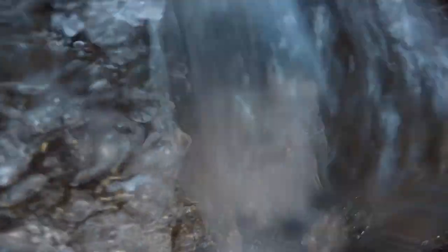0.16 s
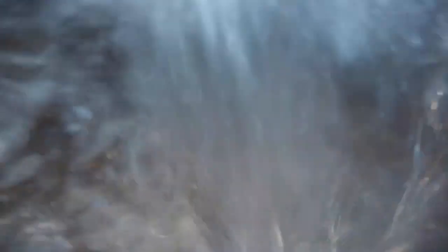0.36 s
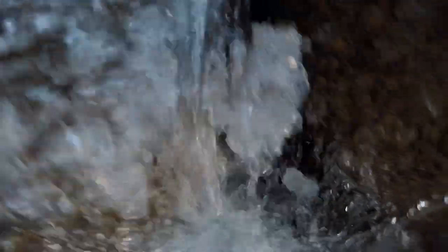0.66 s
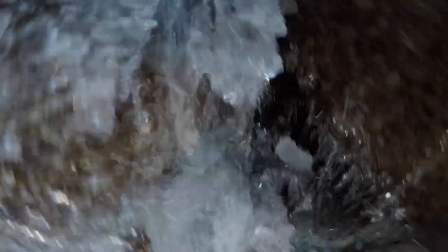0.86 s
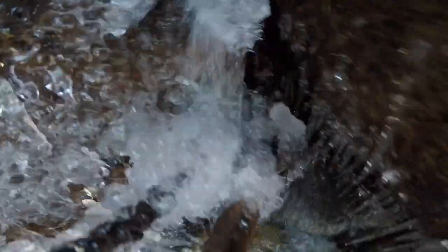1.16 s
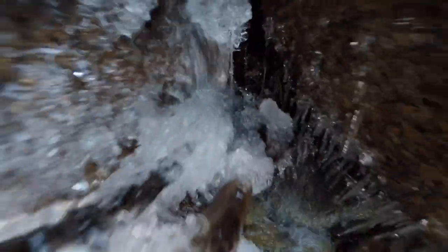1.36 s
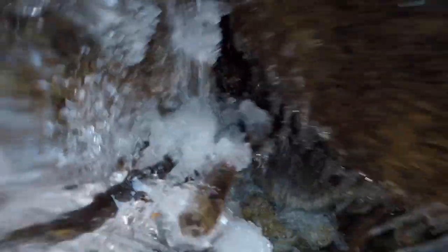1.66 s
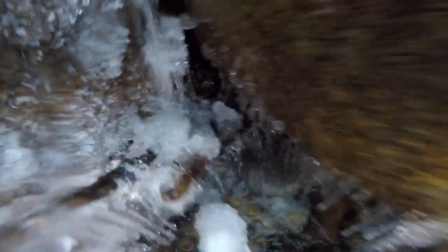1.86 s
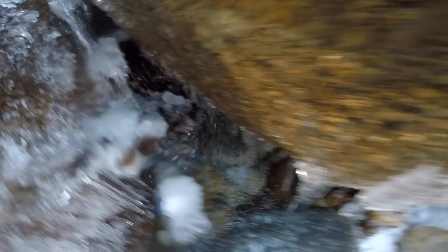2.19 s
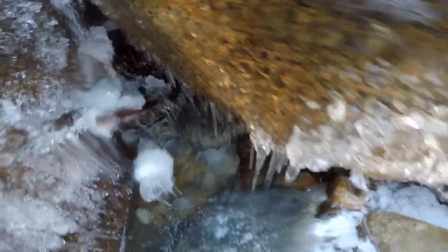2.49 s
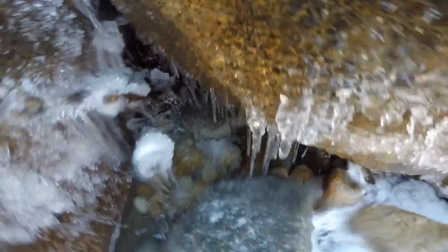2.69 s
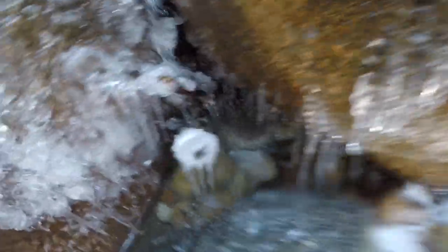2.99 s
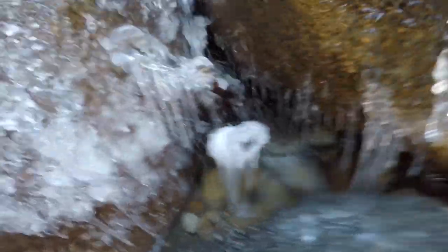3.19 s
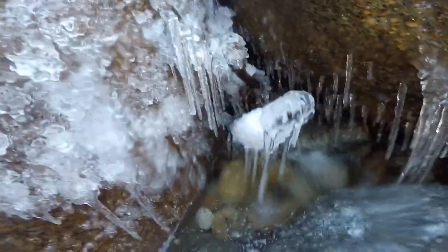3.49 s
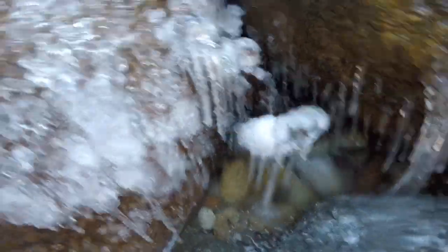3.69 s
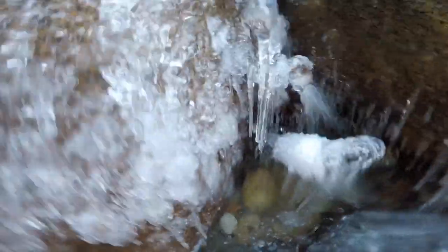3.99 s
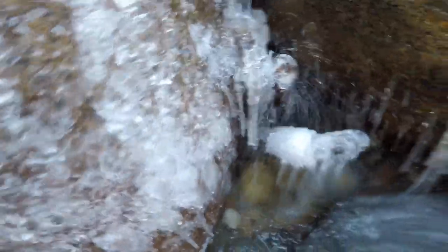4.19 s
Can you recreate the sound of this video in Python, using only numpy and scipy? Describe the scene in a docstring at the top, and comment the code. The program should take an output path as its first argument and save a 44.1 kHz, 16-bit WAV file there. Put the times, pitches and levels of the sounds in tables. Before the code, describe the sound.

Loud underwater glugs and thumps fade to muffled rumbling trickle; after a plop at three seconds the stream's hiss opens up clear.

```python
"""Sealed camera lifted out of a cascade

Close at the microphone, water pours over the case as noise with single slaps; trapped air gulps as short
gliding sines, and two long low hums sound among them. Slosh and wall thrum are low noise; runoff rustles
as noise under a moving edge. Behind lies the brook, noise and small bubbles through a wet microphone port
that rings near 1.7 kHz and clears towards the end.
"""
import sys
import numpy as np
from scipy import signal
from scipy.fft import rfft, irfft, next_fast_len
from scipy.io import wavfile
from scipy.ndimage import uniform_filter1d, minimum_filter1d, map_coordinates

SR = 44100
rng = np.random.default_rng(int(sys.argv[2]) if len(sys.argv) > 2 else 0)


def dump_mix(stems):
    """Bounce the given channels to the path in sys.argv[1] as a 16-bit WAV at rate SR."""
    frames = np.atleast_2d(stems).T  # one column per channel
    limited = np.clip(frames, -1, 1)  # hard clip at full scale
    pcm = np.round(limited * 32767).astype(np.int16)
    wavfile.write(sys.argv[1], SR, pcm)


N = 191733
TIME = np.arange(N) / SR

# gulps and pops of trapped air, and two long low hums (at 3.328 and 4.03 s):
# t/s, nominal level/dB, first pitch f/Hz, length/s
GULPS_AND_HUMS = [(.033, -17, 168.5, 0.036), (.0375, -30, 600, .003), (.055, -31, 620, .003),
                  (.172, -27, 1900, .003), (0.18, -20, 353, 0.012), (0.216, -7, 387, 0.0193),
                  (0.231, -2.5, 241, 0.034), (.252, -5, 600, 0.0033), (.253, -7.5, 2300, 0.0016),
                  (.293, -17, 197, 0.011), (.305, -2, 356, .0028), (.3225, -19.5, 2040, 0.00081),
                  (0.371, -13.5, 870, 0.0013), (0.416, -15, 1165, .0018), (.45, -36, 1550, 0.0045),
                  (.465, -33, 1170, 0.0034), (.522, -39.5, 1950, .003), (.566, -34, 760, 0.00082),
                  (0.591, -38.5, 1530, .005), (0.686, -36, 520, 0.0012), (0.849, -38, 270, 0.013),
                  (0.906, -33.5, 615, 0.00071), (1.1362, -29, 2300, .0006), (1.243, -12, 191, 0.017),
                  (1.32, -25, 216, .014), (1.429, -30.5, 990, 0.0033), (1.481, -18, 320, .0081),
                  (1.5, -15.5, 292, 0.013), (1.595, -29, 480, 0.0084), (1.675, -23, 504, 0.0019),
                  (1.952, -34, 2076, .017), (1.994, -28.5, 200, 0.0095), (2.336, -22, 237, 0.014),
                  (2.655, -29.5, 1797, 0.016), (2.655, -18, 175, 0.031), (2.766, -17.5, 177, .018),
                  (3, -15, 323, 0.0052), (3.0113, -4.5, 372, 0.0079), (3.011, -17, 2000, 0.0032),
                  (3.0213, -3, 940, 0.0015), (3.225, -26, 730, 0.007), (3.235, -18, 726, 0.011),
                  (3.247, -9.5, 994, 0.0042), (3.253, -15, 77, 0.02), (3.328, -20, 92, 0.14),
                  (3.516, -30.5, 460, .056), (3.816, -19, 2590, 0.0058), (4.03, -28.5, 228.3, .15),
                  (4.166, -31.5, 520, 0.0051), (4.168, -22.5, 232.5, 0.051), (4.27, -20, 179, 0.055)]


def amp(db):
    """Linear gain of a level in dB."""
    return 10 ** (np.asarray(db) / 20)


def unit(x):
    """x scaled to rms 1."""
    return x / np.sqrt(np.mean(x ** 2) + 1e-20)


def colour(points):
    """Gain by frequency from (Hz, dB) points, joined on a log frequency axis."""
    f, level_db = np.transpose(points)
    return lambda hz: amp(np.interp(np.log(hz + 1), np.log(f + 1), level_db, -120, -120))


def curves(rows):
    """One value per sample for each column after the time."""
    s, *columns = np.transpose(rows)
    return [np.interp(TIME, s, column) for column in columns]


def wobble(rate):
    """A smooth random curve, rate knots a second."""
    return map_coordinates(rng.standard_normal(int(N * rate / SR) + 4), [TIME * rate])


def swells(rows, rise):
    """Summed gains of (peak s, dB, fall s) swells: 20 dB down after fall (3 ms or more), up in rise * fall."""
    total = 0
    for s, db, fall in rows:
        slope_s = max(fall, .003) * np.where(TIME < s, rise, 1)
        total = total + amp(db - 20 * np.abs(TIME - s) / slope_s)
    return total


def filtered(x, response):
    """x shaped by a response of frequency, padded so that its tail does not wrap round."""
    m = next_fast_len(N + SR // 2)
    return irfft(rfft(x, m) * response(np.fft.rfftfreq(m, 1 / SR)), m)[:N]


def muffled(x, edge_hz):
    """Water over the port takes away what lies above an edge."""
    return filtered(x, lambda hz: 1 / np.sqrt(1 + (hz / edge_hz) ** 8))


def rush(response, patchy_db=0, edge_hz=None, steep=0, size=512):
    """Coloured noise of rms 1 with random patches and, if given, a moving upper edge at steady power."""
    hz, t, z = signal.stft(filtered(rng.standard_normal(N), response), SR, nperseg=size)
    field = uniform_filter1d(rng.standard_normal(z.shape), size=6, axis=0)
    field = uniform_filter1d(field, size=6, axis=1)
    z = z * amp(patchy_db * unit(field))
    if edge_hz is not None:
        gate = 1 / (1 + (hz[:, None] / np.interp(t, TIME, edge_hz)) ** steep)
        power = response(hz)[:, None] ** 2
        # make up the power that the edge takes away
        z = z * gate / np.sqrt((power * gate ** 2).sum(0) / power.sum())
    return unit(signal.istft(z, SR, nperseg=size)[1][:N])


def bubbles(count, hz, spread, cycles, size_db):
    """Many short bubbles of scattered pitch and size, each starting softly and rising in pitch as it dies."""
    draw = rng.random((count, 2))  # place, size
    steps = np.arange(SR // 100)
    pitch_hz = hz * np.exp(spread * rng.standard_normal(count))
    turns = pitch_hz[:, None] * steps / SR
    life = (1 - np.exp(-turns / 1.4)) * np.exp(-turns / cycles)
    strength = amp(-size_db * np.log(draw[:, 1:] + 1e-4))
    grains = strength * life * np.sin(2 * np.pi * turns * (1 + .01 * turns))
    where = (draw[:, :1] * N).astype(int) + steps
    return unit(np.bincount(where.ravel(), grains.ravel(), minlength=N)[:N])


def brook():
    """Rush and small bubbles through the port; the treble comes and goes with the water over it."""
    # brook levels before small trims, the fizz swelling at the very end: t/s, then level/dB of
    # the ring near 1.7 kHz, the hiss near 5 kHz, the fizz near 9 kHz and the fizz near 13 kHz
    bands = [(0, -52.5, -68.5, -81, -99), (.25, -51.5, -63, -80, -99), (.57, -57.5, -69, -78, -103),
             (.81, -61.5, -72, -84, -104), (.97, -58, -70.5, -82, -100), (1.16, -49.5, -64.5, -78, -103),
             (1.47, -46.5, -59.5, -65.5, -86), (1.65, -51, -61.5, -70, -85.5), (1.72, -49.5, -64, -80, -97),
             (2.17, -44.5, -58, -67.5, -87), (2.55, -44, -58, -63.5, -78), (2.75, -45, -56.5, -63, -64),
             (3.07, -41, -55.5, -60, -56.5), (3.15, -41.5, -54.5, -58.5, -75),
             (3.31, -45.5, -53, -68.5, -84), (3.49, -44, -47, -69.5, -87), (3.7, -43.5, -51, -67, -84),
             (3.9, -42.5, -46, -60.5, -77), (4.2, -43, -46, -60, -74), (4.35, -43, -45.5, -53.5, -63.5)]
    # the port clears: t/s, open share (0-1), upper edge f/Hz, rising ring f/Hz, rising ring level/dB
    opening = [(3.05, 0.02, 3940, 2300, -79), (3.15, 0, 4200, 2370, -54), (3.3, 0, 4800, 2750, -49),
               (3.4, 0.5, 5500, 3240, -51), (3.6, 1, 6500, 3800, -50), (3.85, 1, 9400, 3800, -50),
               (4.1, 0.97, 11000, 3700, -55), (4.35, 0.7, 14000, 3680, -65)]
    # ring of the wet port: f/Hz, relative level/dB
    wet_colour = [(250, 1), (380, -7), (700, -11.5), (1150, -11), (1750, -1.5), (2150, -10.5), (2600, -12),
                  (3150, -23), (4000, -48.5)]
    # hiss through the wet port: f/Hz, relative level/dB
    veiled_colour = [(2500, -22), (3300, -3.5), (4300, -0.5), (5100, -4), (5800, 1.5), (6500, -9.5),
                     (7400, -22), (9000, -42)]
    # hiss through the open port: f/Hz, relative level/dB
    clear_colour = [(1800, -31.5), (2400, -9.5), (2900, -6), (3550, 0.5), (6200, -12), (7000, -8.5),
                    (9600, -13), (12000, -59), (15300, -51)]
    # slope under the rising ring: f/Hz, relative level/dB
    rising_colour = [(1700, -39.5), (2300, -16), (3800, 0), (5000, -0.5)]
    # fizz bands: centre f/Hz, spread f/Hz
    fizz_bands = [(9300, 1120), (13300, 990)]
    # a big pop throws water over the port: time, depth of the dip, time constant of its recovery
    covered_s, covered_db, uncover_s = 3.024, -14, 0.055

    ring_db, hiss_db, *fizz_db = curves(bands)
    share, edge_hz, rising_hz, rising_db = curves(opening)
    share = np.clip(share, 0, 1)

    wet_bubbles = bubbles(count=1500, hz=1812, spread=0.175, cycles=5, size_db=2.5)
    wet = rush(colour(wet_colour), patchy_db=2.5) + amp(-7.5) * wet_bubbles

    clear = rush(colour(clear_colour), patchy_db=3.0, edge_hz=edge_hz, steep=4.5)
    spray = muffled(bubbles(count=3000, hz=4730, spread=.4, cycles=2.9, size_db=3.5), edge_hz=7000)
    veiled = rush(colour(veiled_colour), patchy_db=2.3)
    hiss = np.sqrt(1 - share) * veiled + amp(2.0) * np.sqrt(share) * (clear + amp(-4.0) * spray)

    # the port's upper ring climbs as its water thins
    rising = rush(colour(rising_colour), patchy_db=2.5, edge_hz=rising_hz, steep=14)

    sound = amp(ring_db + 0.5) * wet + amp(hiss_db - 1.85) * hiss + amp(rising_db) * rising
    for db, (hz, spread_hz) in zip(fizz_db, fizz_bands):
        fizz = rush(lambda f: np.exp(-((f - hz) / spread_hz) ** 2 / 4), patchy_db=-2.5)
        sound = sound + amp(db - 0.4) * fizz

    dip = (TIME > covered_s) * np.exp(-np.abs(TIME - covered_s) / uncover_s)
    sound = sound * amp(covered_db * dip)
    return amp(.6 * wobble(14) + .9 * wobble(45)) * sound  # splashes lift all bands together


def film():
    """Runoff rustles only below the resonance of the thinning film, a steep moving edge."""
    # two films run off the port in turn: t/s, edge f/Hz, level/dB before a 1 dB lift
    runoff = [(2.96, 686, -89.5), (2.99, 686, -55), (3.025, 1000, -32.5), (3.2, 576, -35),
              (3.27, 1100, -30.5), (3.33, 930, -31.5), (3.45, 800, -34.5), (3.6, 830, -35.5),
              (3.68, 556, -39.5), (3.92, 298, -44), (4.05, 282, -44)]
    edge_hz, level_db = curves(runoff)
    rustle_colour = colour([(150, 2.5), (300, -1.0), (700, -8.0), (1600, 0.0)])
    rustle = rush(rustle_colour, patchy_db=2.0, edge_hz=edge_hz, steep=60, size=1024)
    return amp(level_db + 1.0) * rustle


def case():
    """Water on the case sloshes low and shakes its walls, three damped resonances (thrum)."""
    # slosh: f/Hz, relative level/dB
    slosh_colour = [(8.8, -24.5), (15, 7), (38, -1), (56, -2.5), (83, -8), (110, -57.5), (140, -54.5),
                    (240, -120)]
    # wall resonances: f/Hz, width f/Hz, relative level/dB
    wall_modes = [(87.2, 28.8, 2), (156.6, 31.2, -0.5), (217.5, 76, -6.5)]
    # surges of low slosh, the last only a swell into the end: peak t/s, level/dB, time to fall 20 dB t/s
    surges = [(0, -22, -0.35), (.18, -9, 0.07), (.36, -17, 0.03), (.47, -17, 0.1), (.56, -19.5, 0.03),
              (.69, -21, .08), (.78, -14.5, 0.13), (.91, -18, 0.17), (1.01, -17.5, 0.06),
              (1.19, -19.5, 0.14), (1.51, -14.5, 0.09), (1.63, -10.5, 0.1341), (1.79, -18.5, 0.07),
              (2.46, -27.5, 0.12), (2.63, -21, 0.05), (2.8, -29, 0.04), (2.96, -26, -0.03),
              (3.26, -21.5, 0.04), (3.37, -28.5, .3), (3.96, -29.5, 0.2), (4.35, -16, 0.1)]
    # how hard running water shakes the walls: t/s, thrum level/dB before a 3 dB cut
    shaking = [(0, -21), (.13, -29.5), (.24, -14), (.38, -21), (.45, -30), (.65, -37.5), (1.02, -44.5),
               (1.2, -27), (1.55, -28.5), (1.85, -31.5), (2.25, -30.5), (2.58, -22.5), (2.73, -28.5),
               (3.0, -23.5), (3.35, -25), (3.63, -27.5), (4.2, -22), (4.35, -29)]
    surge_rise, calm_db = 0.6, -47.5  # rise over fall time; slosh between surges
    # gulps and hums below this pitch come with a jolt of the walls: level against them, time to fall 20 dB
    jolt_hz, jolt_db, jolt_s = 400, -9, 0.042
    jolt_low_hz = 132  # a quick jolt hardly stirs the walls below this

    def walls(f):
        total = 0
        for k, (centre, width, db) in enumerate(wall_modes):
            mode = 1j * f * width / (centre * centre - f * f + 1j * f * width)
            total = total + (-1) ** k * amp(db) * mode
        return total / (1 + (f / 260) ** 6)  # the soft seal damps the walls' upper ring

    shoves = rng.standard_normal(N) * amp(2.0 * wobble(24.74))
    thrum = unit(filtered(shoves, walls))
    jolted = filtered(thrum, lambda f: 1 / np.sqrt(1 + (jolt_low_hz / (f + 1)) ** 6))
    jolts = [(s + length / 2, db + jolt_db, jolt_s)
             for s, db, hz, length in GULPS_AND_HUMS if hz < jolt_hz]

    slosh = unit(filtered(rng.standard_normal(N), colour(slosh_colour)))
    sloshing = (amp(calm_db) + swells(surges, surge_rise)) * slosh
    thrumming = amp(curves(shaking)[0] - 3) * thrum
    return sloshing + thrumming + swells(jolts, rise=0.52) * jolted


def pour():
    """A lumpy wash over the port, with single slaps: a dull body and a shorter, bright crackle."""
    # slaps of water on the port: t/s, crackle level/dB before its trim, body over crackle level/dB
    slaps = [(0.0348, -54, 30), (0.053, -50, 26), (.17, -33, 6), (0.1813, -27, 21.5), (.189, -29, 23.5),
             (0.2048, -41, 24), (0.2142, -41.5, 26), (0.2408, -42.5, 33), (.247, -34.5, 21),
             (0.2538, -24.5, 24.5), (.259, -29.5, 15), (0.2647, -45, 24), (0.2806, -49, 30),
             (0.2874, -44, 22), (0.3024, -51, 23), (0.3233, -45, 3), (0.3623, -42, 0), (.3671, -39, 10),
             (.519, -45.5, -6), (1.1361, -31.5, -14), (1.291, -60, 3), (1.4694, -40, 10), (1.5273, -53, 3),
             (1.5872, -49, 3), (1.7523, -46, 19), (1.764, -44, 13), (1.879, -47, 0), (2.31, -42, 2),
             (3.012, -46, 28), (3.2924, -33.5, 17.5), (3.5528, -32, -6), (4.141, -39, -20),
             (4.2694, -38, 5), (4.306, -34, 2)]
    # washes over the port, before the lumps: peak t/s, level/dB, time to fall 20 dB t/s
    washes = [(.05, -27, .04), (.088, -29, .016), (.208, -14, .025), (.26, -31.5, 0.1242),
              (.31, -30, 0.0762), (.37, -33, .012), (.415, -37.5, 0.02), (.568, -48, 0.05),
              (1.3, -39.5, 0.18), (1.5, -30, .06), (1.595, -42.5, 0.08), (1.68, -39, -0.08),
              (1.76, -29, -0.05), (2.01, -51, 0.2)]
    # trickle that swells and thins, stopping at the last time; before the lumps: t/s, level/dB
    trickle = [(0, -68.5), (.6, -61), (1.03, -58), (1.12, -49), (1.6, -49), (1.9, -60), (2.1, -48.5),
               (2.98, -45.5)]
    # dull body of the pour: f/Hz, relative level/dB
    pour_colour = [(240, -4.5), (400, -0.5), (470, -7.5), (720, -6.5), (1000, -9.5), (1550, -14),
                   (1850, -33.5), (2400, -31), (3200, -49.5)]
    # bright crackle: f/Hz, relative level/dB
    crackle_colour = [(1200, -21), (2000, 2.5), (3200, -3.5), (4600, 1.5), (6300, -8), (9000, -21),
                      (13000, -41.5)]
    body_t60_s, crackle_t60_s = 0.019, 0.011  # time to fall 60 dB
    wash_rise = .8  # rise over fall time

    body, crackle = np.zeros(N + SR), np.zeros(N + SR)
    t = np.arange(SR // 10) / SR
    rise = np.sin(np.pi / 2 * np.minimum(t / .0007, 1)) ** 2  # 0.7 ms onset
    for s, db, body_db in slaps:
        start = round(s * SR)
        body[start:][:len(t)] += rise * amp(db + body_db - 60 * t / body_t60_s)
        crackle[start:][:len(t)] += rise * amp(db - 60 * t / crackle_t60_s)

    lumps = amp(2.8 * wobble(70) - 3.5)
    # the washes stop with the trickle
    wash = (amp(curves(trickle)[0]) + swells(washes, wash_rise)) * lumps * (TIME < trickle[-1][0])
    dull = muffled((wash + body[:N]) * rush(colour(pour_colour), patchy_db=2.5), edge_hz=2220)
    bright_gain = amp(-1.5) * crackle[:N] + amp(-31.5) * wash
    return dull + bright_gain * rush(colour(crackle_colour), patchy_db=3.0)


def gulps_and_hums():
    """Each gulp, pop or hum is a sine that swells fast, sinks in pitch and fades."""
    # over its length a full-scale low sine sinks by this share of its pitch;
    # weak ones sink less, and those well above sag_hz hardly at all
    sag, sag_hz, sag_grows = 0.677, 650, .45
    out = np.zeros(N + SR)
    for s, db, first_hz, length in GULPS_AND_HUMS:
        u = np.arange(round(2.5 * length * SR)) / (length * SR)  # time in lengths
        sink = sag * amp(sag_grows * db) / (1 + (first_hz / sag_hz) ** 2)
        hz = first_hz * (1 - sink) ** np.minimum(u, 1.2)
        swell = np.e * u / 0.23 * np.exp(-u / 0.27)
        out[round(s * SR):][:len(u)] += amp(db) * swell * np.sin(2 * np.pi * np.cumsum(hz) / SR)
    return out[:N]


def scene():
    """The brook behind, the runoff and the case, then pour and muffled gulps close up, as one channel."""
    return (brook() + film() + case() + pour() + muffled(gulps_and_hums(), edge_hz=1860))[None]


def record(dry):
    """A limiter holds the peaks at 0.97 of full scale, then a filter removes all above the band limit."""
    top_hz = 15290
    needed = np.minimum(1, .97 / (np.abs(dry[0]) + 1e-9))
    gain = uniform_filter1d(minimum_filter1d(needed, size=401), size=400)  # about 9 ms windows
    return filtered(gain * dry[0], lambda hz: hz < top_hz)[None]


dry = scene()
out = record(dry)
dump_mix(out)
```